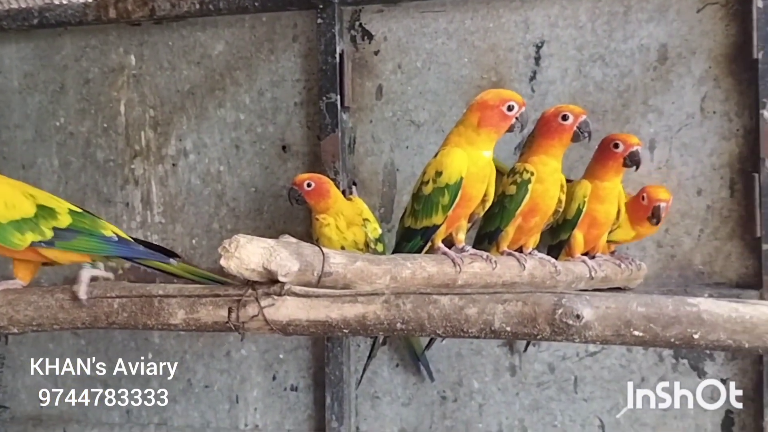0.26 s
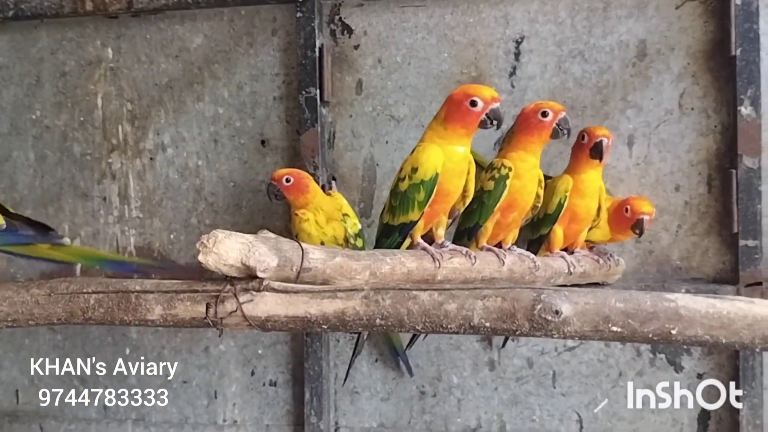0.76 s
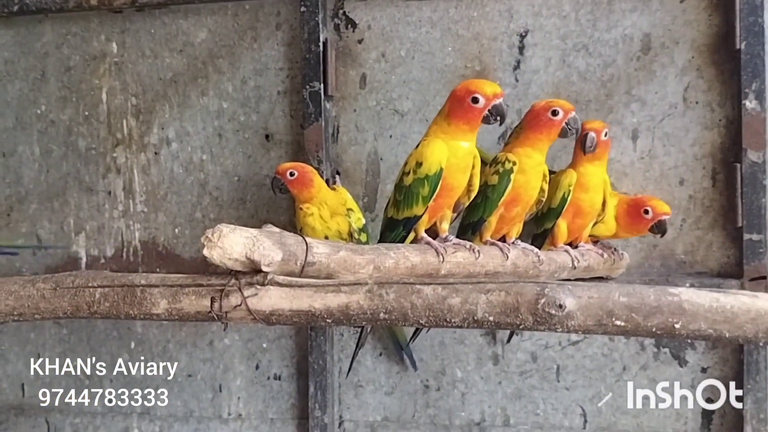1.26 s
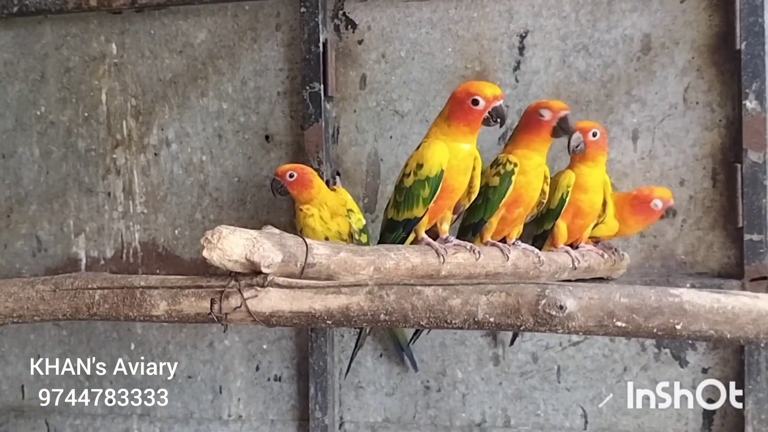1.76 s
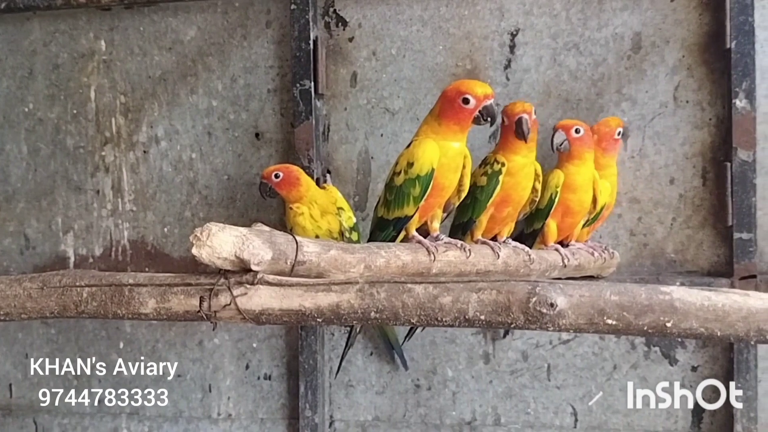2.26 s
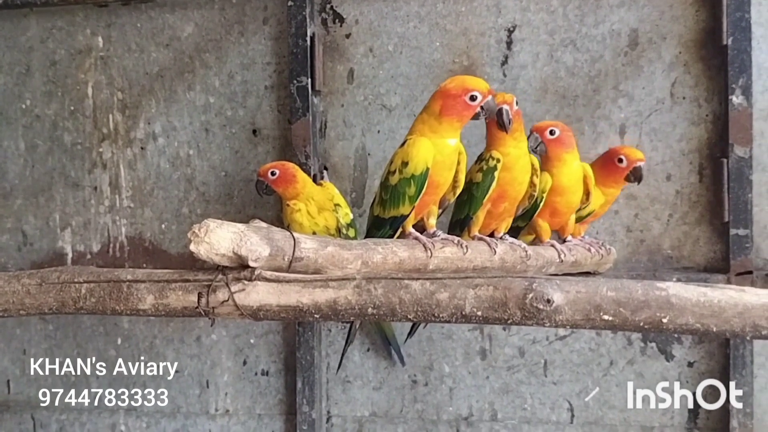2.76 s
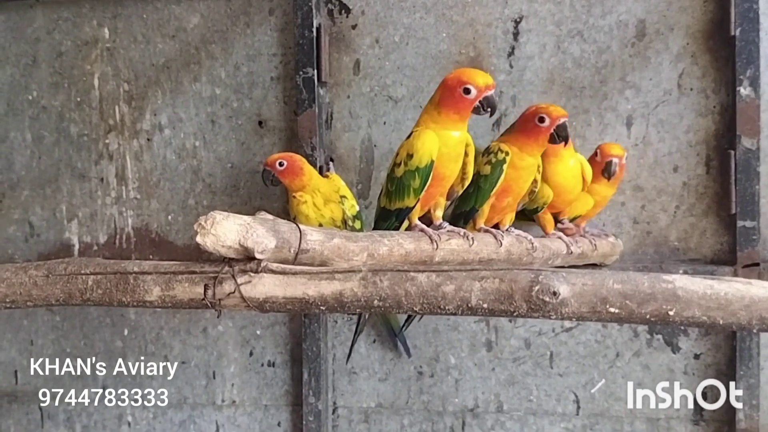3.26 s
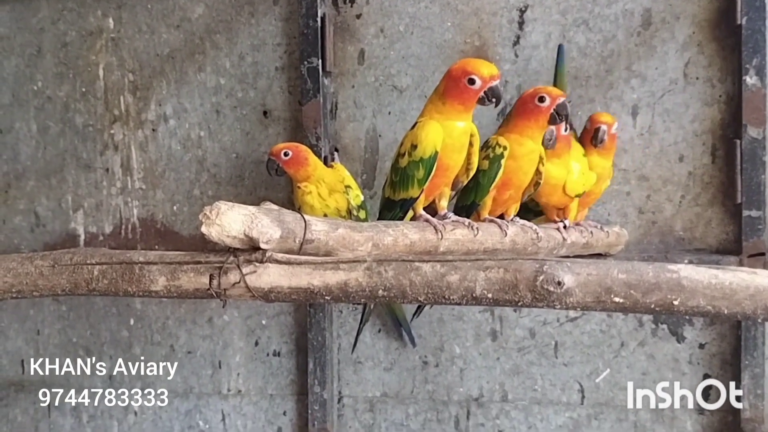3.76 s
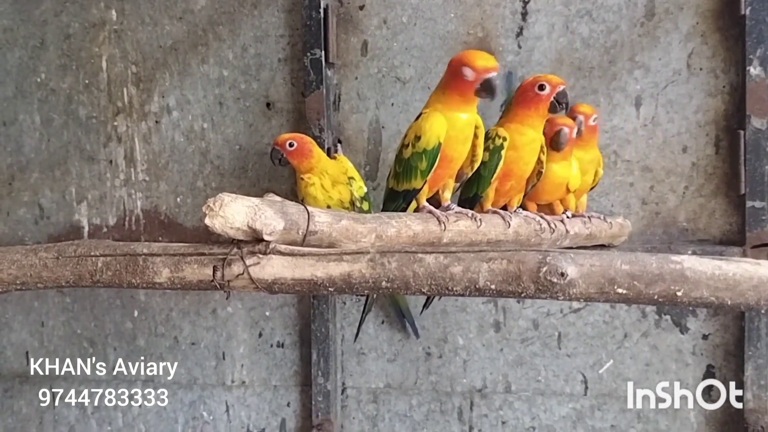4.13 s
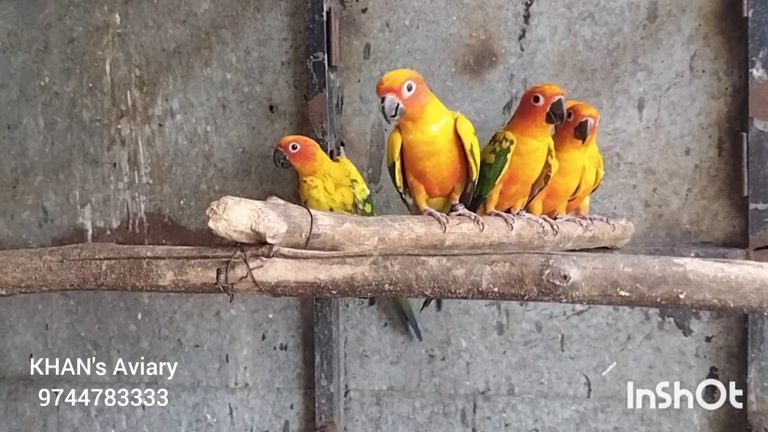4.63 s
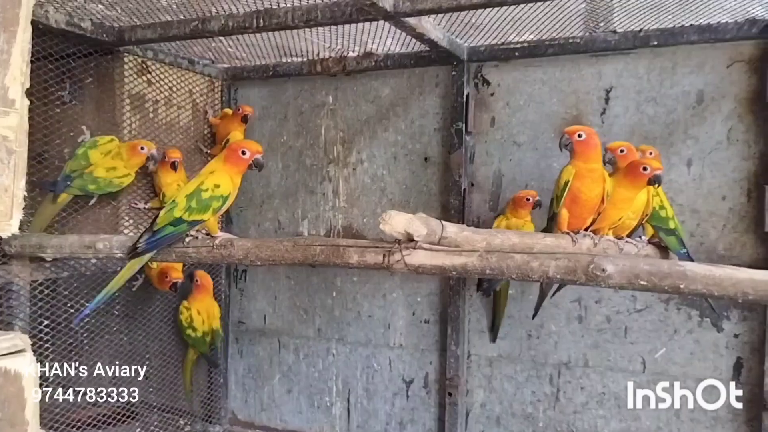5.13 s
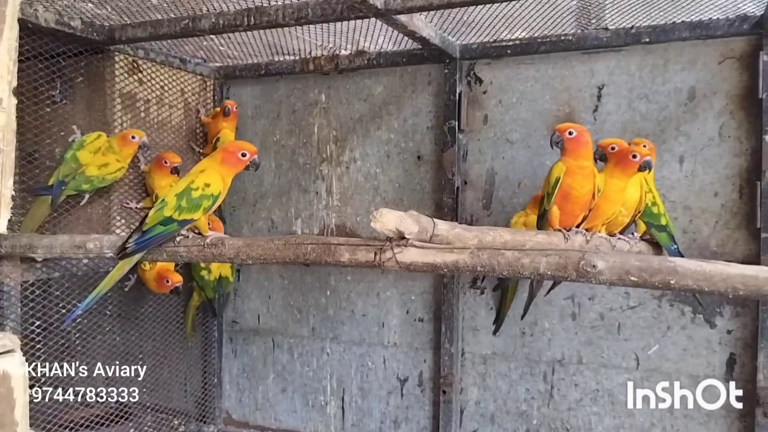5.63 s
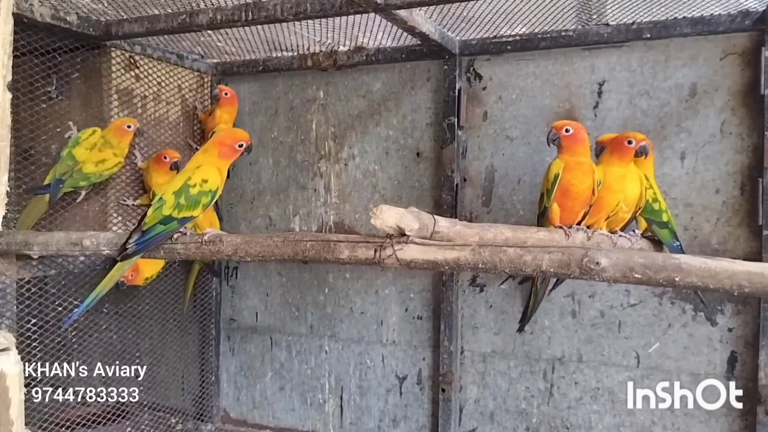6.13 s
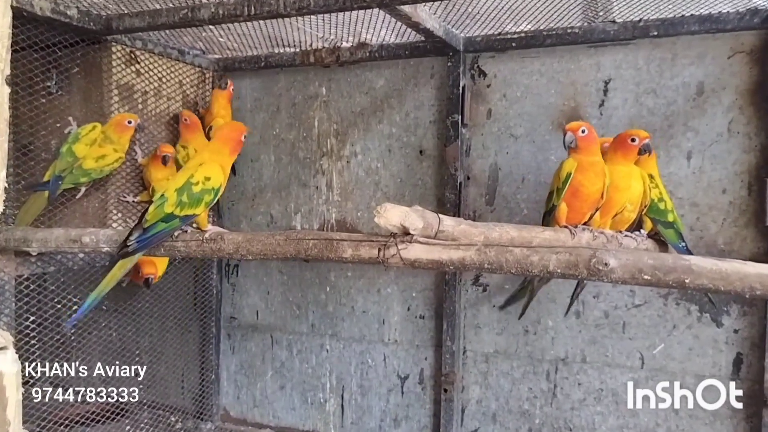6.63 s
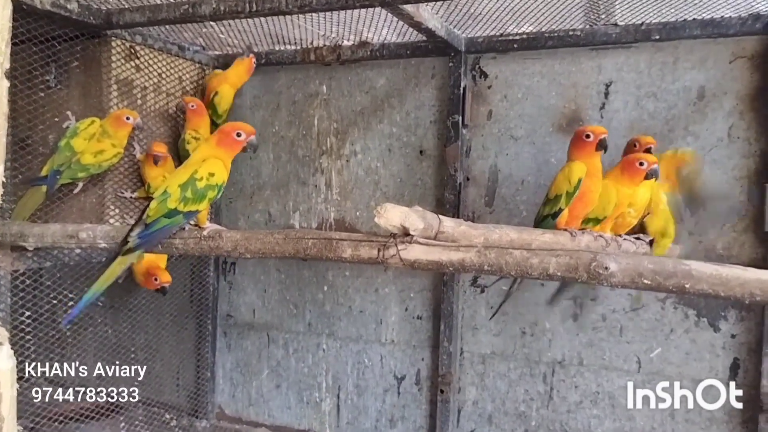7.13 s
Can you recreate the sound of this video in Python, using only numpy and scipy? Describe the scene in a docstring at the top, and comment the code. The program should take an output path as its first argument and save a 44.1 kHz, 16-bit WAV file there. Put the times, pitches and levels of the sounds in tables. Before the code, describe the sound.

A flock of small parrots is heard close in a hard-walled aviary, in stereo, with short slap echoes and a ringing tail. From 0 to 1.9 s, loud throbbing squawks crowd together, breaking into piercing shrieks near 0.3, 1.25 and 1.7 s, with a strong harsh cry at 1.55 s. A lull follows; from 2.2 to 3.05 s, weaker cries and distant-sounding shrieks ring. A raspy rattle comes at 3.1 s, then a sharp squawk and shriek at 3.4-3.6 s. Faint air, low motor hum and soft shuffling remain until low croaks at 4.75-4.95 s. Total silence lasts from 4.96 to 5.63 s. Sound returns with a soft buzzing thump and a rising squawk near 5.85 s, then a hollow nasal cry at 6.1 s. Hoarse rattles at 6.4 and 6.75 s mix with low wingbeat puffs, a bright double shriek at 6.9 s and a slight shuffle at 7.1 s, fading into quiet air.

```python
"""Sun conures in a small aviary

A flock screeches close by: each cry is a fast-throbbing reed tone, a harsh squawk or a clear shriek.
Slower throbs stand apart as rattles and low croaks. Noise-tail echoes make the walls and building ring.
Behind are filtered-noise air, the sine hum of a far motor, brushing shuffles and low wingbeat puffs.
The sound goes silent once and comes back with a soft, briefly buzzing thump.
"""
import sys
import numpy as np
from scipy import signal
from scipy.fft import rfft, irfft, next_fast_len
from scipy.io import wavfile
from scipy.ndimage import uniform_filter1d, minimum_filter1d, map_coordinates

SR = 44100
rng = np.random.default_rng(int(sys.argv[2]) if len(sys.argv) > 2 else 0)


def output_pcm(signal):
    """Save a mono or channel-first signal as 16-bit PCM at the path in sys.argv[1].

    Samples are clipped to [-1, 1] before scaling.
    """
    pcm = np.clip(np.atleast_2d(signal).T, -1, 1) * 32767
    wavfile.write(sys.argv[1], SR, np.round(pcm).astype(np.int16))


N = 325899

# Outdoor air spectrum. Each row: frequency in Hz, relative density in dB per Hz.
AIR_SPECTRUM = [(15, -26.5), (25, -3), (70, -7), (130, -0.5), (200, -2), (330, -12), (537, -17), (680, -12),
                (919, -20), (1900, -22), (6730, -25.5), (8130, -35), (12200, -32.5), (15500, -50)]
# Air level over time, before a fixed lift and a wobble. Each row: time in seconds, level in dB.
AIR_LEVEL = [(0, -53), (2, -55), (2.8, -53), (3.598, -55), (4.3, -53), (4.9, -58), (5.7, -48), (6.3, -49.5),
             (7.39, -51)]
# Motor hum partials, before swell and wobble. Each row: frequency in Hz, level in dB.
HUM_PARTIALS = [(90, -57.5), (152, -59.5)]
# Gain on the hum over time. Each row: time in seconds, gain in dB.
HUM_SWELL = [(0, 5.5), (1.1, 2.5), (1.5, 0.5), (2.1, -6.5), (2.4, 1), (4.1, 2.5), (4.5, 0.5), (5, 2),
             (5.6, -28)]
# Silent span: start in seconds, end in seconds.
SILENCE = (4.962, 5.632)
# Feathers and feet on the perch. Each row: start in seconds, length in seconds, level in dB, centre in Hz.
SHUFFLES = [(3.926, 0.19, -51, 920), (4.05, 0.19, -51, 172), (4.381, 0.084, -52.5, 375),
            (4.42, 0.12, -53.5, 213), (5.895, 0.085, -46.5, 500), (7.076, 0.14, -46, 637)]
# Wingbeats. Each row: time in seconds, level in dB (the puff peaks 8 dB lower).
WINGBEATS = [(6.461, -25), (6.528, -34), (6.645, -29), (6.787, -35), (6.867, -38), (6.971, -29),
             (7.17, -29.5), (7.218, -37)]
# Ring of the building. Each row: frequency in Hz, 60 dB decay time in seconds.
HALL_DECAY = [(200, 0.4312), (1000, .65), (2500, 0.61), (5000, 0.49), (8000, 0.38), (14000, 0.4)]
# Microphone colour, on the birds' voices. Each row: frequency in Hz, left-right difference in dB.
MICROPHONE_SIDES = [(500, -6.5), (1500, -3.5), (3000, -2.5), (5000, 3.5), (7000, 2.5), (9000, -12),
                    (14000, -11.5)]
# Throat and beak responses. Each row: frequency in Hz, gain in dB.
CRY_THROAT = [(300, -57.5), (550, -23.5), (800, -3.5), (1300, -6.5), (2000, -2), (3000, -3), (4200, -2),
              (5600, -6.5), (7000, -10.5), (8500, -18.5), (10000, -21), (12500, -31), (15500, -38.5)]
HOLLOW_THROAT = [(500, -13), (1450, -31.5), (2200, -10.5), (2900, -1), (4300, 2), (5800, -5), (7200, -4),
                 (8600, -22), (12000, -19), (15000, -65)]
RATTLE_THROAT = [(300, -49.5), (600, -26), (950, -1.5), (1350, -9.5), (1800, -8.5), (2500, 4.5), (3400, -6),
                 (4400, 4.5), (5500, -8.5), (7000, -8.5), (8500, -21), (10000, -20), (15000, -34.5)]
CROAK_THROAT = [(300, -44), (500, -44), (680, -6.5), (950, -7.5), (1250, -5.5), (1800, 1.5), (2200, 0),
                (2550, 3.5), (2900, -15), (4300, -7), (6500, -18), (8000, -40), (15000, -46.5)]
# Rattles of single rasps. Each row: start in seconds, rasp count, first gap in seconds, base level in dB,
# step in dB per rasp, pitch in Hz at 0 dB effort, mean brightness in dB per octave.
RATTLES = [ (1.834, 2, 0.022, -18.5, -6, 1321, 5), (3.087, 7, .019, -16, -0.39, 1242, 1.5),
           (6.41, 10, .0189, -12.5, -0.32, 1321, 1.5), (6.75, 7, 0.019, -12.5, -0.95, 1348, 1)]
# Low croaks of pulses. Each row: start in seconds, pulse count, first gap in seconds, base level in dB,
# step in dB per pulse, pitch in Hz at 0 dB effort, mean brightness in dB per octave.
CROAKS = [(4.763, 7, .0117, -24.5, -0.66, 900, -1.2), (4.854, 4, .0199, -20, -1.8, 898, -0.44)]
# Harsh squawks, each one arch of effort. Each row: start in seconds, rise in seconds, fall in seconds,
# level at the peak in dB, swell in dB, top pitch in Hz, glide in octaves, roughness at the peak 0-1,
# throb depth 0-1, brightness at the peak in dB per octave, gain of the fundamental in dB,
# left-right difference in dB, hall in dB re direct.
SQUAWKS = [ (.183, .155, 0.073, -10, 13.5, 1450, 0.56, 0.57, .55, 1, -6, 4.5, -4),
           (.71, 0.1, .055, -26.5, 16, 1373, 0.31, 0.32, 0, -2, -8.5, 0.5, 5),
           (.974, .133, 0.038, -15.5, 10.5, 1559, 0.72, 0.48, 0.72, -1.5, -7.5, 4.5, 1.5),
           (1.146, 0.023, 0.02, -16.5, -2.5, 1484, 0.098, 0.57, 0.25, -2, -12.5, 5, 2.5),
           (1.2, 0.061, .073, -18, 2, 1600, 0.18, .6, 0.38, 0.5, -9.5, 5.5, -1),
           (1.533, 0.14, 0.083, -9, 12, 1590, .38, .37, .9, 2.5, -11, 1.5, -6),
           (2.235, 0.11, 0.092, -33, 5.5, 1147, 0.14, 0.37, 0.66, 0, -4, -0.5, 4.5),
           (2.525, 0.071, 0.059, -33.5, 9.5, 798, 0.11, 0.43, 0.5, -2.5, 7, 4.5, 2),
           (2.631, .1, 0.029, -26.5, 8.5, 1576, 0.32, 0.33, 0.47, -6.5, -13.5, 0, 6),
           (3.393, 0.028, .022, -30, 2, 1136, .15, .7, 0.4, 2, -1.5, 2.5, -12),
           (3.42, .035, .11, -16.5, 2.5, 1411, 0.21, 0.63, 0.4, 2, -6.5, 7.5, -6),
           (3.558, 0.044, 0.085, -24.5, 9.5, 1315, 0.13, 0.44, 0, -2, -9.5, 2, 2.5),
           (4.669, 0.049, 0.031, -43, 3, 1150, 0.12, 0.63, 0, -8, 4, 1, 7.5),
           (5.755, .12, 0.099, -14.5, 20, 1639, 0.66, 0.4, 0.53, 2, -7.5, 4, 1.5)]
# Clear shrieks. Each row: start in seconds, rise in seconds, fall in seconds, level at the peak in dB,
# top pitch in Hz, glide in octaves, roughness at the peak 0-1, mean throbs per second,
# brightness at the peak in dB per octave, gain of the fundamental in dB,
# left-right difference in dB, hall in dB re direct.
SHRIEKS = [ (0, 0.002721, 0.079, -12.5, 1511, 0.015, 0.34, 73, 3, -4, 5, -3.5),
           (.311, 0.042, 0.02, -7, 2108, 0.11, 0.18, 60, 1.5, -4, 1.5, -6),
           (1.243, 0.043, .032, -9, 1961, .11, .13, 108, -3.5, -12, -1, -4.5),
           (1.724, 0.0025, .02, -13, 1430, 0.079, 0.11, 80, -2.5, -13.5, 1.5, -7),
           (1.875, 0.031, .055, -21, 1530, 0.058, 0.41, 48, -5.5, -10, 1.5, -3.5),
           (2.549, .022, 0.037, -33, 2185, .03, 0.33, 80, -6, 1, 2, 2),
           (2.725, .055, 0.092, -21.5, 2193, .13, .22, 101.7, 7, 4, -5, 9.5),
           (2.815, .06, 0.059, -18, 1952, 0.071, 0.25, 98, 4.5, 0.5, 1.5, 3.5),
           (2.978, 0.054, 0.051, -18, 2012, 0.0834, 0.2, 95, 1.5, -0.5, 2, 3.5),
           (3.497, 0.0333, 0.0253, -11, 1862, 0.1, .13, 62, 4, -6.5, 5.5, -11),
           (5.647, 0.011, 0.033, -26.5, 1769, 0.04514, 0.42, 120, 3, 1.5, 5, 17),
           (6.884, 0.042, 0.018, -13.5, 2300, 0.072, .14, 82, -3.5, -10, 6.5, 4),
           (6.92, 0.02, 0.0096, -13.5, 2074, 0.052, 0.15, 61, 4, -7.5, 3.5, 6)]
# One hollow nasal cry: start in seconds, rise in seconds, fall in seconds, level at the peak in dB,
# top pitch in Hz, glide in octaves, roughness at the peak 0-1.
NASAL_CRY = (6.06, 0.08, 0.24, -18.5, 1449.5, 0.27, 0.18)

TOP_HZ = 15750
SQUAWK_THROBS_PER_S = 80
SHRIEK_SWELL_DB, SHRIEK_THROB_DEPTH = 4.5, .72
SQUAWK_ATTACK_S, SHRIEK_ATTACK_S, RELEASE_S = .024, .005, .007
EDGE_ROUGH_SHARE = .45  # extra share of roughness where the effort is least
EDGE_BRIGHT_DB_PER_OCTAVE = -2  # the beak is half shut where the effort is least
MOUTH_SHUT_HZ, MOUTH_OPEN_HZ, MOUTH_DB = 2880, 4970, 2.5
RASP_S, CROAK_PULSE_S = .0095, .0065
GAP_GROWTH = .03  # each gap of a train is this share longer than the last
FIRST_PULSE_DB = -6.5  # a train starts with a weak pulse
OCTAVES_PER_DB = 0.46  # weaker pulses are lower
RATTLE_WALLS_DB, RATTLE_WALLS_T60_S = 2.5, .04


def amp(db):
    """Decibels to gain."""
    return 10 ** (np.asarray(db) / 20)


def unit(x):
    """Scale to rms 1."""
    return x / np.sqrt(np.mean(x ** 2) + 1e-20)


def energy_one(h):
    """Scale each channel to energy 1."""
    return h / np.linalg.norm(h, axis=1, keepdims=True)


def along(points, hz):
    """Interpolate (Hz, value) points on a log frequency axis."""
    point_hz, value = np.transpose(points)
    return np.interp(np.log(hz + 1), np.log(point_hz + 1), value)


def over_time(points):
    """Interpolate (seconds, value) points over the whole scene."""
    return np.interp(np.arange(N) / SR, *np.transpose(points))


def wobble(n, knots_per_s):
    """Smooth random curve of n samples."""
    knots = rng.standard_normal(int(n * knots_per_s / SR) + 4)
    return map_coordinates(knots, [np.arange(n) * knots_per_s / SR], mode="nearest")


def filtered(x, response):
    """Apply a gain that is a function of frequency."""
    n = x.shape[-1]
    m = next_fast_len(n + 2048)
    return irfft(rfft(x, m) * response(np.fft.rfftfreq(m, 1 / SR)), m)[..., :n]


def add(track, start_s, x):
    """Mix x into the track."""
    start = max(round(start_s * SR), 0)
    track[:, start:start + x.shape[1]] += x[:, :N - start]


def air():
    """Outdoor air: shaped noise, alike in both ears in the bass, its level wobbling."""
    side_db = [(150, -13), (400, -11.5), (1000, 0.5)]  # (Hz, dB)

    def response(hz):
        return amp(along(AIR_SPECTRUM, hz)) * [np.ones_like(hz), amp(along(side_db, hz))]

    mid, side = filtered(rng.standard_normal((2, N)), response)
    level_db = over_time(AIR_LEVEL) + 3.5 + 3.0 * wobble(N, 8)
    return amp(level_db) * unit(np.array([mid + side, mid - side]))


def motor_hum():
    """Distant motor: sine partials that drift a little in pitch and level."""
    hum = np.zeros(N)
    for hz, db in HUM_PARTIALS:
        level = amp(db + 0.79 * wobble(N, 2.0))
        drifting_hz = hz * (1 + 0.0034 * wobble(N, 2.4))
        hum += level * unit(np.sin(2 * np.pi * np.cumsum(drifting_hz) / SR))
    return hum * amp(over_time(HUM_SWELL))


def thump(start_s=5.632, rise_s=0.036, fall_s=0.03, buzz_hz=160, gain_db=-20):
    """Soft low-passed push, buzzing while it rises, as the sound comes back."""
    t = np.arange(N) / SR - start_s
    times_s = [0, rise_s, rise_s + fall_s, rise_s + 0.89 * fall_s, rise_s + 4 * fall_s]
    push = np.interp(t, times_s, [0, -1.1, -0.019, -0.043, 0])
    buzz = signal.sawtooth(2 * np.pi * buzz_hz * t) * (t < rise_s)
    return amp(gain_db) * filtered(push * (0.53 + 0.5 * buzz), lambda hz: 1 / (1 + (hz / 900) ** 2))


def shuffles(width_octaves=0.81):
    """Birds jostling: soft brushing swells of band-passed noise."""
    out = np.zeros((2, N))
    for start_s, length_s, db, centre_hz in SHUFFLES:
        n = int(length_s * SR)

        def band(hz):
            return 1 / (1 + (np.log2((hz + 1) / centre_hz) / width_octaves) ** 2)

        mid, side = filtered(rng.standard_normal((2, n)), band)
        brush = unit(np.array([mid + side / 2, mid - side / 2]))
        add(out, start_s, amp(db) * np.hanning(n) * brush)
    return out


def wings(puff_hz=160, length_s=0.068):
    """Each wingbeat pushes a low puff of air: a short sine under a smooth swell."""
    out = np.zeros((2, N))
    t = np.arange(int(length_s * SR)) / SR
    for time_s, db in WINGBEATS:
        hz = puff_hz * (1 + 0.036 * rng.standard_normal())
        puff = np.sin(2 * np.pi * hz * t) * np.hanning(len(t))
        add(out, time_s - .015, amp(db - 8) * np.array([puff, puff]))
    return out


def syrinx(pitch_hz, rough, fundamental_db):
    """Buzzing membrane: roughness shakes its pitch and scatters its pulse sizes, smearing the harmonics."""
    flutter, flutter_per_s = 0.137, 1500
    shimmer_per_s, hiss, rasp = 1300, 0.46, 1.57
    n = len(pitch_hz)
    phase = 2 * np.pi * np.cumsum(pitch_hz * (1 + flutter * rough * wobble(n, flutter_per_s))) / SR
    k = np.arange(1, 15)[:, None]  # harmonic numbers
    gain = amp(fundamental_db * (k == 1)) * (k * pitch_hz < SR / 2)
    tone = unit(np.sum(np.cos(k * phase) * gain, axis=0))
    noise = unit(tone * wobble(n, shimmer_per_s) + hiss * rng.standard_normal(n))
    noise_share = np.clip(rasp * rough ** 2, 0, 1)
    return np.sqrt(1 - noise_share) * tone + np.sqrt(noise_share) * noise


def mouth(x, pitch_hz, resonance_hz, corner=0.65, width_octaves=0.15):
    """Thin out what lies below the voice's pitch; add the mouth's resonance."""
    def response(hz):
        ring_db = MOUTH_DB / (1 + (np.log2((hz + 1) / resonance_hz) / width_octaves) ** 2)
        return amp(ring_db) * (1 - 1 / (1 + (hz / (corner * pitch_hz)) ** 4))

    return filtered(x, response)


def beak(x, throat, bright_db_per_octave, knee_hz=2000, top_hz=6500):
    """Throat colour, its upper resonances lifted as the beak opens; rms 1."""
    def response(hz):
        octaves = np.log2(np.clip(hz, knee_hz, top_hz) / knee_hz)
        return amp(along(throat, hz) + bright_db_per_octave * octaves)

    return unit(filtered(x, response))


def aviary(x, pan_db, hall_db, walls_db, walls_t60_s):
    """Direct sound, a quick scatter off the cage walls and the long ring of the building."""
    noise = rng.standard_normal((2, SR * 3 // 4))
    hz, frame_s, spectrum = signal.stft(noise, SR, nperseg=256)
    decay = amp(-60 * frame_s / along(HALL_DECAY, hz)[:, None])
    tail = signal.istft(spectrum * decay, SR, nperseg=256)[1]
    t = np.arange(tail.shape[1]) / SR
    tail = tail * (1 - np.exp(-t / 0.0029))
    # cubing makes the scatter sparse
    walls = rng.standard_normal(tail.shape) ** 3 * amp(-60 * t / walls_t60_s)
    response = amp(walls_db) * energy_one(walls) + amp(hall_db) * energy_one(tail)
    response[[0, 1], [0, 14]] += 1  # direct sound, 14 samples later on the right
    sides = unit(amp([[pan_db / 2], [-pan_db / 2]]))
    return sides * signal.fftconvolve(x[None], energy_one(response), axes=1)


def burst(length_s, pitch_hz, throat, bright_db_per_octave, arch=0.19):
    """One hoarse throb of rms 1 that starts abruptly, its pitch arching."""
    swell = np.sqrt(np.abs(np.sin(np.linspace(0, np.pi, int(length_s * SR)))))
    buzz = syrinx(pitch_hz * (1 + arch * (swell - .8)), rough=0.8, fundamental_db=-6)
    return unit(swell * beak(buzz, throat, bright_db_per_octave))


def trains(rows, throat, length_s, scatter_db=0.86, bright_scatter_db=1.9, throat_shift=0.042):
    """Trains of hoarse pulses that slow down; the throat shifts a little from pulse to pulse."""
    out = np.zeros((1, N))
    for start_s, count, gap_s, db, step_db, pitch_hz, bright_db in rows:
        for k, (size, colour, shift) in enumerate(rng.standard_normal((round(count), 3))):
            effort_db = step_db * k + FIRST_PULSE_DB * (k == 0) + scatter_db * size
            shifted = np.multiply(throat, [np.exp(throat_shift * shift), 1])
            pulse_hz = pitch_hz * 2 ** (OCTAVES_PER_DB * effort_db)
            pulse = burst(length_s, pulse_hz, shifted, bright_db + bright_scatter_db * colour)
            pulse_s = start_s + gap_s * np.sum((1 + GAP_GROWTH) ** np.arange(k))
            add(out, pulse_s, amp(db + effort_db) * pulse[None])
    return out[0]


def rattles():
    """Slow throbs stand apart as single rasps; deep in the throat they make a croak."""
    walls = dict(walls_db=RATTLE_WALLS_DB, walls_t60_s=RATTLE_WALLS_T60_S)
    rasps = trains(RATTLES, RATTLE_THROAT, RASP_S)
    croaks = trains(CROAKS, CROAK_THROAT, CROAK_PULSE_S)
    rasps = aviary(rasps, pan_db=5.5, hall_db=-2, **walls)
    croaks = aviary(croaks, pan_db=4.5, hall_db=-5.5, **walls)
    return (rasps + croaks)[:, :N]


def gate(t, length_s, attack_s):
    """Attack, hold and release of the voice, 0 outside its length."""
    return np.clip(np.minimum(t / attack_s, (length_s - t) / RELEASE_S), 0, 1)


def cry(rise_s, fall_s, db, top_hz, glide_octaves, rough, throat, bright_db, fundamental_db,
        swell_db, throbs_per_s, depth, attack_s, arch=0.064, lag_rad=.7):
    """Arch of effort raises pitch, brightness and clearness, and level by swell_db; throbs swell and bend it."""
    length_s = rise_s + fall_s
    t = np.arange(int(length_s * SR)) / SR
    n = len(t)
    slack = np.interp(t, [0, rise_s, length_s], [-1, 0, 1]) ** 2  # 0 at the peak, 1 at the ends
    rough = np.clip(rough * (1 + EDGE_ROUGH_SHARE * slack), 0, 1)
    beat = 2 * np.pi * np.cumsum(throbs_per_s * (1 + 0.054 * wobble(n, 60))) / SR
    wander = (.008 + .055 * rough) * wobble(n, 200)
    bend = 1 - arch * depth * np.cos(beat - lag_rad) + wander
    pitch_hz = top_hz * 2 ** (-glide_octaves * slack) * bend
    throb = unit((1 - depth * np.cos(beat)) * amp(wobble(n, 90)))
    buzz = syrinx(pitch_hz, rough, fundamental_db)
    wide_open = beak(mouth(buzz, top_hz, MOUTH_OPEN_HZ), throat, bright_db)
    half_shut = mouth(buzz, top_hz * 2 ** -glide_octaves, MOUTH_SHUT_HZ)
    half_shut = beak(half_shut, throat, bright_db + EDGE_BRIGHT_DB_PER_OCTAVE)
    voice = (1 - slack) * wide_open + slack * half_shut
    return amp(db - swell_db * slack) * gate(t, length_s, attack_s) * throb * voice


def squawks(walls_db, walls_t60_s, give_way=0.84):
    """Harsh cries that give way while the voice breaks into a shriek."""
    out = np.zeros((2, N))
    for (start_s, rise_s, fall_s, db, swell_db, hz, glide, rough, depth,
         bright_db, fundamental_db, pan_db, hall_db) in SQUAWKS:
        voice = cry(rise_s, fall_s, db, hz, glide, rough, CRY_THROAT, bright_db, fundamental_db,
                    swell_db, SQUAWK_THROBS_PER_S, depth, SQUAWK_ATTACK_S)
        t = start_s + np.arange(len(voice)) / SR
        gates = [gate(t - s, up + down, SHRIEK_ATTACK_S) for s, up, down, *_ in SHRIEKS]
        voice = voice * (1 - give_way * np.max(gates, axis=0))
        add(out, start_s, aviary(voice, pan_db, hall_db, walls_db, walls_t60_s))
    return out


def shrieks(walls_db, walls_t60_s):
    """Clear cries, each with its own throb rate."""
    out = np.zeros((2, N))
    for (start_s, rise_s, fall_s, db, hz, glide, rough, throbs_per_s,
         bright_db, fundamental_db, pan_db, hall_db) in SHRIEKS:
        voice = cry(rise_s, fall_s, db, hz, glide, rough, CRY_THROAT, bright_db, fundamental_db,
                    SHRIEK_SWELL_DB, throbs_per_s, SHRIEK_THROB_DEPTH, SHRIEK_ATTACK_S)
        add(out, start_s, aviary(voice, pan_db, hall_db, walls_db, walls_t60_s))
    return out


def nasal_cry():
    """One cry with a strong fundamental through a hollow throat."""
    out = np.zeros((2, N))
    start_s, *shape = NASAL_CRY
    voice = cry(*shape, HOLLOW_THROAT, bright_db=-0.5, fundamental_db=10, swell_db=25,
                throbs_per_s=90, depth=0.34, attack_s=SQUAWK_ATTACK_S)
    add(out, start_s, aviary(voice, pan_db=2.5, hall_db=4.5, walls_db=7, walls_t60_s=0.043))
    return out


def cries():
    """The flock's screeches, each from its own perch."""
    walls = dict(walls_db=5, walls_t60_s=0.039)
    return squawks(**walls) + shrieks(**walls) + nasal_cry()


def scene():
    """Surroundings, wings and the birds' voices, the latter with the microphone's left-right colour."""
    def sides(hz):
        return amp(np.outer([.5, -.5], along(MICROPHONE_SIDES, hz)))

    voices = filtered(cries() + rattles(), sides)
    return air() + motor_hum() + thump() + shuffles() + wings() + voices


def record(dry):
    """A limiter holds the peaks down, the band ends at TOP_HZ and the sound goes silent for a moment."""
    t = np.arange(N) / SR
    silence_start_s, silence_end_s = SILENCE
    live = uniform_filter1d(1. * ((t < silence_start_s) | (t > silence_end_s)), size=200)
    needed = 1 / np.maximum(1, np.abs(dry).max(axis=0) / .97)
    gain = uniform_filter1d(minimum_filter1d(needed, size=261), size=131)
    return live * filtered(gain * dry, lambda hz: np.clip((TOP_HZ - hz) / 100, 0, 1))


dry = scene()
out = record(dry)
output_pcm(out)
```